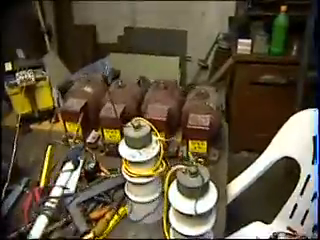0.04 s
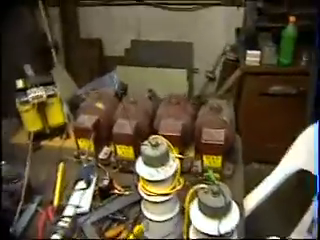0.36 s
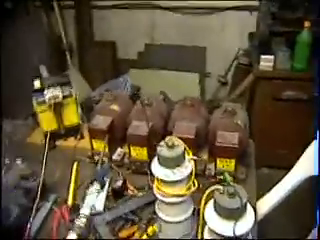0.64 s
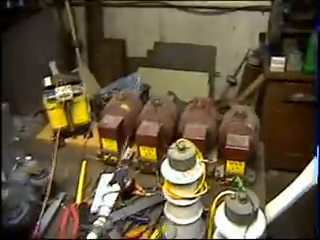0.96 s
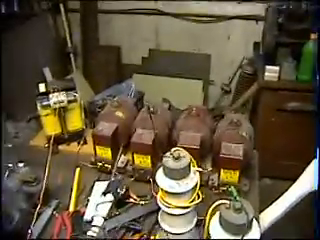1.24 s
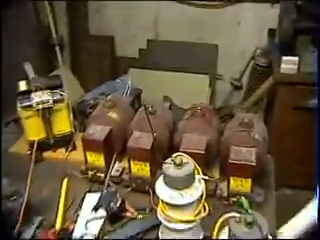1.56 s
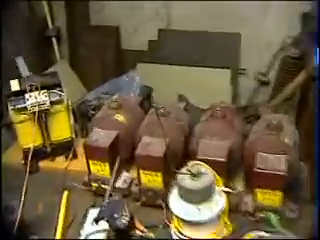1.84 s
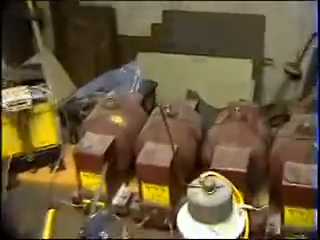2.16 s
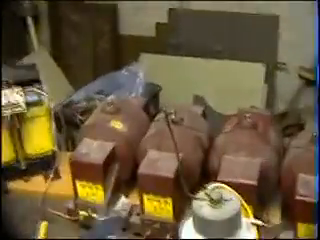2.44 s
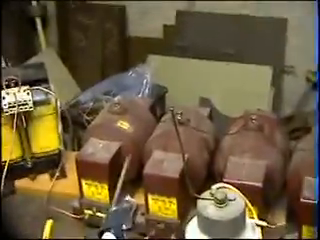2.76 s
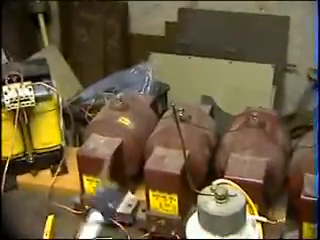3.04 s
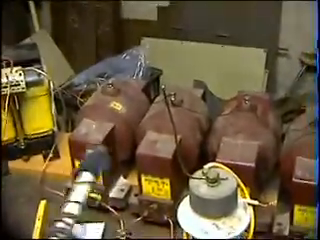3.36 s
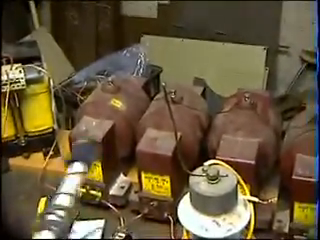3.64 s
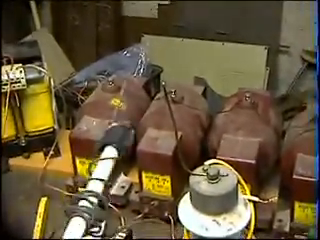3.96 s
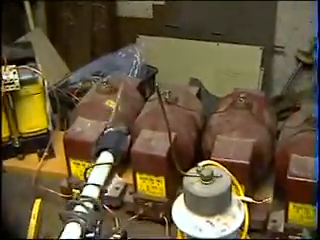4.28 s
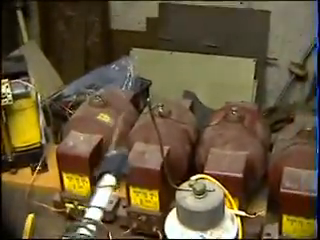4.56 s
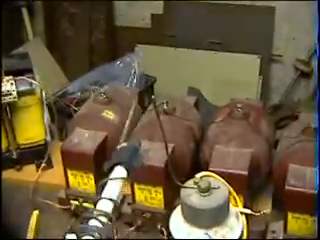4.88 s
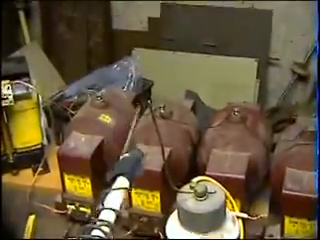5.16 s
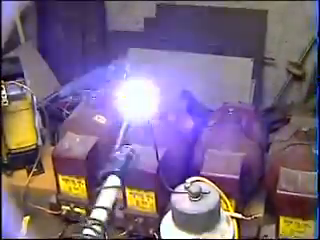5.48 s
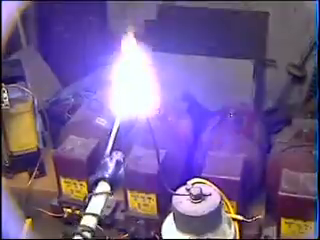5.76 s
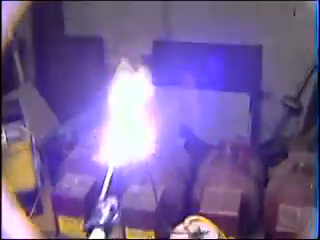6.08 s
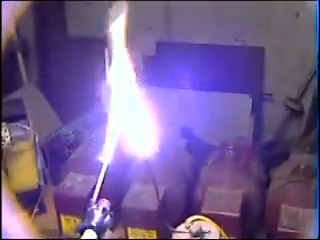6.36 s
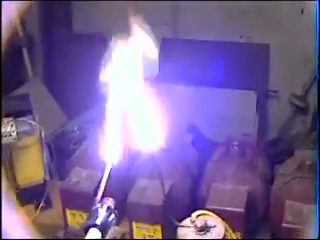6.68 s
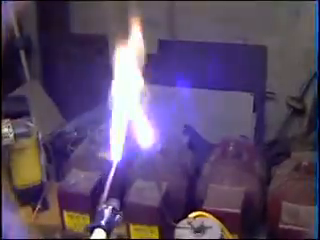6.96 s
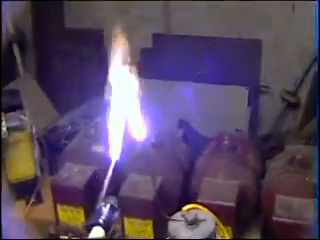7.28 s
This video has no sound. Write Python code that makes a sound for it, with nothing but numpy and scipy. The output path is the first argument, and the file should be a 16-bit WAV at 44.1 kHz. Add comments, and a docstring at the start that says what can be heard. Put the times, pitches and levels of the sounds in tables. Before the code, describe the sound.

A low-key electrical hum with a few handling clicks gives way to a spark's snap and a loud, rasping arc.

```python
"""In a workshop, high-voltage transformers hum on 50 Hz mains while a hand-held camera clicks and zooms.
A rod nears the live wire, a spark cracks across and an arc is drawn out. It loads the transformers,
so their hum sinks. The arc goes out and lights again a hundred times a second: a harsh buzz that
roughens, crackles and pops as the arc grows into a flame."""
import sys
import numpy as np
from scipy import signal
from scipy.fft import rfft, irfft, next_fast_len
from scipy.io import wavfile
from scipy.ndimage import uniform_filter1d

SR = 44100
rng = np.random.default_rng(int(sys.argv[2]) if len(sys.argv) > 2 else 0)


def dump_mix(stems):
    """Bounce the given channels to the path in sys.argv[1] as a 16-bit WAV at rate SR."""
    frames = np.atleast_2d(stems).T  # one column per channel
    limited = np.clip(frames, -1, 1)  # hard clip at full scale
    pcm = np.round(limited * 32767).astype(np.int16)
    wavfile.write(sys.argv[1], SR, pcm)


N = 331632
TIME = np.arange(N) / SR
BEAT_HZ = 100   # a beat is half a mains cycle: the current passes through zero once in each
BEAT_SAMPLES = SR // BEAT_HZ
BEAT = np.round(TIME * BEAT_HZ).astype(int)   # number of the nearest beat
BEAT_MS = (TIME - BEAT / BEAT_HZ) * 1000   # time before or after that beat
DIRECTION = 1 - 2 * (BEAT % 2)   # which way the current flows, +1 or -1


# The rod draws the arc out. Each row: time in seconds, arc length from 0 to 1.
ARC_LENGTH = [(5.44, 0.06), (5.51, 0.08), (5.61, 0.42), (5.85, 0.57), (6.15, 0.58), (6.32, 0.84),
              (6.6, 0.99), (6.95, 0.8), (7.5, 0.68)]
# Hot gas billows up and the flame surges. Each row: time of the peak in seconds, rise of the rasp in dB.
FLAME_SURGES = [(5.742, 12.5), (5.845, 9), (5.94, 8), (6.02, 8), (6.122, 11), (6.228, 12), (6.4, 8),
                (6.49, 7.5), (6.595, 6.5), (6.69, 5), (6.81, 10.5), (6.975, 9.5), (7.121, 10.5),
                (7.249, 11), (7.32, 10), (7.38, 10), (7.44, 11)]

def arc(room, lit_s=5.42, swell_s=0.037, flame_s=5.574, flame_rise_s=0.28, surge_width_s=0.019):
    """A calm ball of glowing gas turns into a wild flame; the longer it is, the louder and rougher."""
    length = in_time(ARC_LENGTH)[0]
    spread = 0.4 + 0.6 * length   # a longer arc makes broader pulses
    lit = ramp(lit_s, swell_s)
    calm = 1 - ramp(flame_s, flame_rise_s)
    growth_db = 5.5 * np.log2(length)
    surge_db = sum(db * bell_curve(TIME - s, surge_width_s) for s, db in FLAME_SURGES)
    flame = lit * np.minimum(spread + 0.27, 1)
    buzz = arc_buzz(length, spread, calm) * lit * from_db(-26.5 + growth_db + 0.2 * surge_db)
    rasp = flame_rasp(length, spread) * flame * from_db(-45 + growth_db - 21 * calm ** 2 + surge_db)
    crackle = arc_crackle(length, spread) * flame * from_db(-42.5 - 6 * calm)
    # of the buzz, only what changes from beat to beat scatters round the room
    change = (buzz - np.pad(buzz, (BEAT_SAMPLES, 0))[:N]) / np.sqrt(2)
    to_bench = from_db(-9) * change + from_db(-8) * rasp + from_db(-13) * crackle
    to_room = from_db(-1.5) * change + from_db(-4) * rasp + from_db(-6.5) * crackle
    return from_left(buzz + rasp + crackle) + bench_echoes(to_bench) + convolve(to_room, room)


# The pressure swings in one beat of a full-length arc: the gas cools, lights again, then sags.
# Each row: delay in ms, width in ms, relative pressure, timing scatter in ms, shift with direction in ms.
PRESSURE_SWINGS = [(-.12, 0.27, -0.59, 0.13, -0.011), (.42, 0.25, 0.97, 0.15, 0.016),
                   (1.8, .36, -.38, .2, -.14)]
# The tone of the buzz. Each row: frequency in Hz, relative level in dB.
BUZZ_TONE = [(60, -19), (130, -9), (220, -13), (350, -2.5), (600, 1), (800, -3.5), (1200, -4.5),
             (1700, -1.5), (3000, 3.5), (6000, 21.5)]
# Standing waves, the notes that build up between the walls. Each row: pitch in Hz, width in Hz, gain in dB.
ROOM_NOTES = [(101.2, 5, -3.5), (207.6, 7.5, 11), (304.6, 16.5, 4), (409.5, 3.5, 8.5), (489.4, 4.3, 3.5),
              (600, 1.9, -6.5), (893, 23, 2), (1097, 29.3, 2.5)]
# One more such note swells and fades as the camera moves through it. Each row: time in seconds, gain in dB.
SWELLING_NOTE = [(5.45, 9.7), (5.62, 12), (5.85, 17.5), (6.1, 16), (6.4, 7.4), (7.0, 15), (7.5, 15)]

def arc_buzz(length, spread, calm, thin_below_length=0.54, note_hz=1400, note_width_hz=5.4):
    """Each time the current passes zero, the gas cools and lights again, sending out a pressure pulse."""
    unrest = length * (1 - 0.31 * calm)
    # in a short arc the swings crowd together, so the buzz is thin and bright
    spacing = 0.29 + 0.71 * np.minimum(length / thin_below_length, 1)
    pulses = 0
    for delay, width, pressure, scatter, shift in PRESSURE_SWINGS:
        late_ms = BEAT_MS - delay * spacing - unrest * (scatter * beat_chance() + shift * DIRECTION)
        stretch = from_db(2.2 * unrest * beat_chance())   # the same heat, released faster or slower
        pulses = pulses + pressure / stretch * bell_curve(late_ms, width * spread * stretch)
    buzz = convolve(pulses * from_db(length * beat_chance()), tone_filter(BUZZ_TONE))[0]
    notes = ROOM_NOTES + [(note_hz, note_width_hz, in_time(SWELLING_NOTE)[0])]
    buzz = buzz + sum(from_db(db) * resonance(buzz, hz, width) for hz, width, db in notes)
    return buzz / band_level(buzz, 200, 1700)


# The tone of the flame's rasp. Each row: frequency in Hz, relative level in dB.
RASP_TONE = [(200, -20), (500, -12), (900, 3), (1500, 4.5), (1900, -1), (2400, 2), (2900, 1.5),
             (3400, -7.5), (5000, -11.5), (12000, -59)]

def flame_rasp(length, spread, shocks_per_s=6000, width_ms=0.78):
    """The swirling flame tears each pulse into a few sharp shocks, stronger in one current direction."""
    strength = from_db(length * (1.5 * DIRECTION + 2 * beat_chance()))
    tearing = strength * bell_curve(BEAT_MS - 0.45, width_ms * spread)
    shocks = (rng.random(N) < shocks_per_s / SR) * rng.standard_normal(N)
    rasp = convolve(shocks * tearing, tone_filter(RASP_TONE))
    return rasp / band_level(rasp, 1700, 3300)


def rod_touch(start_s=5.4012, decay_s=0.0045, level_db=-33.5):
    """The rod touches the wire with a short, raspy tick before the arc takes hold."""
    burst = die_away(start_s, decay_s) * rng.standard_normal(N)
    shape = tone_filter(RASP_TONE)
    return from_db(level_db) * from_left(convolve(burst, shape / np.linalg.norm(shape)))


# The tone of the crackle. Each row: frequency in Hz, relative level in dB.
CRACKLE_TONE = [(500, -27.5), (1500, -15), (2900, -10.5), (3500, -16.5), (4850, -21.5), (5800, -12.5),
                (6600, -11.5), (7800, -19.5), (9000, -17.5), (10000, -22), (11700, -24), (12800, -81)]

def arc_crackle(length, spread, lead_ms=0.33, threads_ms=0.36):
    """On each beat a first snap strikes, thin threads of spark crackle and a second snap closes the gap."""
    first_snap = tick_at(-lead_ms * length)
    threads = rng.standard_normal(N) * np.exp(-np.abs(BEAT_MS - 0.15) / (threads_ms * (spread + length)))
    # the gap closes later when the arc is long, and later in one current direction
    closes_ms = 0.2 + length * (0.7 + 0.2 * DIRECTION + 0.25 * beat_chance())
    second_snap = tick_at(closes_ms) * from_db(2.8 * beat_chance())
    strength = from_db(spread * (2.8 * DIRECTION + 1.5 * beat_chance()))
    snaps = (6 * first_snap + threads + 4.6 * second_snap) * strength
    crackle = convolve(snaps, tone_filter(CRACKLE_TONE))
    return crackle / band_level(crackle, 3500, 11000)


# The reedy tone of the young arc. Each row: frequency in Hz, relative level in dB.
SINGING_TONE = [(300, -23), (900, -16), (1200, -11), (1400, 7.5), (1550, -2), (1800, 1), (2300, 0.5),
                (3000, 3), (3600, -12), (5000, -17), (9000, -33)]

def arc_singing(room, start_s=5.445, attack_s=0.02, fade_db_per_s=18, level_db=-47.5):
    """The short arc ticks at each zero and each crest of the current: a clean tone that fades away."""
    place = np.arange(N) % BEAT_SAMPLES
    ticks = (place == 0) + 0.73 * (place == BEAT_SAMPLES // 2)
    ticks = ticks * from_db(-4 * drift(60))
    fade = from_db(-fade_db_per_s * np.maximum(TIME - start_s, 0))
    tone = rms_one(convolve(ticks, tone_filter(SINGING_TONE))[0]) * ramp(start_s, attack_s) * fade
    return from_db(level_db) * (from_left(tone) + from_db(3) * convolve(tone, room))


# Sharp sparks. Each row: start in seconds, peak level in dB.
SPARKS = [(5.2303, 5.5), (5.4018, -23), (5.4401, -31), (5.4595, -23), (6.6401, -7.5), (6.7905, -3.5),
          (6.8605, -9.5), (7.1405, -21), (7.2402, -20), (7.3801, -18)]
# The tone of a spark. Each row: frequency in Hz, relative level in dB.
SPARK_TONE = [(100, -12), (350, -2.5), (900, -4), (1600, -3.5), (2200, 0.5), (2700, 5.5), (3200, 5),
              (4000, -2.5), (5400, 3.5), (6600, 11), (7500, 5), (8400, 2.5), (10000, 0), (11700, -4),
              (13200, -32)]

def sparks(room, ring_hz=6300, ring_width_hz=3500):
    """Each spark is one sharp crack with a brief bright ring, echoed by the bench and the room."""
    shocks = np.zeros(N)
    for s, db in SPARKS:
        shocks[int(s * SR)] = from_db(db)
    shape = tone_filter(SPARK_TONE)
    shape = shape - 2 * resonance(shape, ring_hz, ring_width_hz)   # rings on without changing the tone
    crack = convolve(shocks, shape / np.abs(shape).max())[0]
    return from_left(crack) + from_db(-15) * bench_echoes(crack) + from_db(-7) * convolve(crack, room)


# Hollow pops in the flame. Each row: time in seconds, level in dB.
FLAME_POPS = [(6.5015, -8), (6.5913, -21), (6.6401, -19), (6.7906, -11), (6.8606, -19), (7.1108, -21),
              (7.141, -17), (7.2214, -21), (7.2412, -19), (7.3013, -21), (7.3811, -18)]

def flame_pops(room, width_s=0.00021):
    """The flame's loop takes a short cut: the new path flares (a push) and the old one goes out (a dip)."""
    waves = np.zeros(N)
    for s, db in FLAME_POPS:
        age = np.clip((TIME - s) / width_s, -10, 10)
        waves -= from_db(db) * age * np.exp((1 - age ** 2) / 2)
    waves = cut_bass(waves, 260, order=2)
    return from_left(waves) + from_db(-8) * bench_echoes(waves) + from_db(-7) * convolve(waves, room)


# The hum of the iron cores. Each row: multiple of the beat rate, relative level in dB.
CORE_HUM = [(1, -53), (2, -27.5), (3, -0.5), (4, -7), (5, -19), (6, -6.5), (7, -12.5), (8, -11), (9, -24),
            (10, -19), (11, -59), (12, -28), (13, -14.5), (14, -14), (15, -28.5), (16, -23), (17, -16),
            (18, -25.5), (19, -15.5), (20, -23), (21, -23), (22, -22.5), (23, -22.5), (24, -13.5),
            (25, -20), (26, -16.5), (27, -28), (28, -27.5), (29, -30), (30, -24.5)]
# The thin ringing of the cores' iron sheets. Each row: pitch in Hz, level in dB.
SHEET_RINGING = [(3200, -72), (3700, -78), (3800, -76.5), (4075, -76.5), (4500, -78), (4800, -78),
                 (5100, -86), (5400, -72.5), (6600, -80.5), (9500, -82), (9600, -88), (9700, -82),
                 (10200, -86), (10400, -91), (10700, -86.5)]

def transformers(waver_db=0.68, sizzle_hz=3050, strike_s=5.2303, loaded_db=-19, sink_s=0.01):
    """The cores flex twice a mains cycle; their hum sinks once the first spark pulls the voltage down."""
    phase = 2 * np.pi * BEAT_HZ * TIME
    core = 0
    for multiple, db in CORE_HUM:
        # each overtone reaches left and right a little out of step
        offset = rng.uniform(0, 2 * np.pi) + 0.33 * rng.choice([-1, 1]) * np.array([[1], [-1]])
        overtone = every_beat(np.cos(multiple * phase[:BEAT_SAMPLES] + offset))
        core = core + from_db(db + waver_db * drift(4.41)) * overtone
    ringing = 0
    for hz, db in SHEET_RINGING:
        offset = rng.uniform(0, np.pi, (2, 1))
        ringing = ringing + from_db(db) * np.sqrt(2) * np.cos(2 * np.pi * hz * TIME + offset)
    # loose sheets rattle the same way on every beat
    rattle_tone = [(2000, -35), (3500, 2), (6000, -4.5), (8000, -21), (10500, -28), (12500, -36)]
    rattle = convolve(every_beat(rng.standard_normal((2, BEAT_SAMPLES))), tone_filter(rattle_tone))
    # an uneven sizzle swells with each beat
    sizzle = resonance(resonance(rng.standard_normal(N), sizzle_hz, 704), sizzle_hz, 736)
    sizzle = sizzle * (1 + np.cos(phase)) ** 2 * from_db(2 * drift(55))
    hum = from_db(-43) * rms_one(core) + ringing + from_db(-69) * rms_one(rattle)
    hum = hum + from_db(-63) * from_left(rms_one(sizzle))
    sinking = np.exp(-np.maximum(TIME - strike_s, 0) / sink_s)
    voltage = from_db(loaded_db) + (1 - from_db(loaded_db)) * sinking
    return hum * voltage * from_db([[-1], [1]])   # a little louder on the right


# Fingers touch the camera. Each row: start in seconds, level in dB, decay in seconds,
# pitch of the touched panel in Hz, gain of its ring in dB, gain of the bright snap in dB.
FINGER_TOUCHES = [(0.5498, -27, 0.0014, 3100, -12, 7), (.5518, -32, 0.0027, 420, 18, -11),
                  (0.6847, -32, 0.0053, 1600, 0, -12), (.85, -42, .005, 1500, 4, -20),
                  (.995, -42, 0.0074, 580, 17, -20), (1.308, -38, 0.0061, 1500, -6, -20),
                  (2.255, -29.5, 0.0079, 497, 8, -18), (2.265, -25, 0.0049, 1800, 7, -16),
                  (2.28, -38, 0.014, 2200, 3, -20)]
# The tone of those touches. Each row: frequency in Hz, relative level in dB.
TOUCH_TONE = [(100, -36), (300, 1), (600, 3.5), (1100, -2.5), (1900, 4), (3200, 3), (4000, -10),
              (6000, -11), (7500, -19), (10000, -18.5), (12000, -51)]

def finger_clicks(gain_db=-7.5, ring_width_hz=950, snap_hz=4500):
    """Each touch starts with one hard contact, then the case rattles and the touched panel rings."""
    touches = 0
    for s, db, decay_s, ring_hz, ring_db, snap_db in FINGER_TOUCHES:
        force = from_db(db) * die_away(s, decay_s)
        contact = 4.7 * np.maximum(np.diff(force, prepend=0), 0)
        touch = contact + force * rng.standard_normal(N)
        ring = resonance(resonance(touch, ring_hz, ring_width_hz), ring_hz, ring_width_hz) / 2
        snap = cut_bass(touch, snap_hz, order=2)
        touches = touches + touch + from_db(ring_db) * ring + from_db(snap_db) * snap
    shape = tone_filter(TOUCH_TONE)
    return from_db(gain_db) * convolve(touches, shape / np.linalg.norm(shape))


def zoom_motor(start_s=1.29, stop_s=2.33, fade_s=0.053, whine_hz=4580, turns_per_s=14.25, gain_db=-66):
    """The camera's zoom motor whines for a second and throbs once with each turn."""
    gears = rng.standard_normal((2, N))
    whine = sum(from_db(db) * rms_one(resonance(resonance(gears, hz, 380), hz, 380))
                for hz, db in [(whine_hz, 0), (2 * whine_hz, -1)])
    running = np.clip(np.minimum(TIME - start_s, stop_s - TIME) / fade_s, 0, 1)
    throb = (1 + 0.67 * np.cos(2 * np.pi * turns_per_s * (TIME - start_s))) / 2
    return from_db(gain_db) * running * throb * whine


def bench_echoes(x, first_ms=1.7, decay_ms=2.9, size=1024):
    """The gear on the bench throws back a dense spray of echoes within a few milliseconds."""
    late_ms = np.maximum(np.arange(size) / SR * 1000 - first_ms, 0)
    echoes = all_round_noise([(100, 0), (15000, 0)], size) * (late_ms > 0) * np.exp(-late_ms / decay_ms)
    return convolve(x, echoes / np.linalg.norm(echoes[0]))


# How long the room rings. Each row: frequency in Hz, seconds to fade by 60 dB.
ECHO_TIMES = [(200, 0.24), (1000, 0.84), (2500, 2), (4500, 0.5), (8000, 0.62), (13000, 0.7)]
# The tone of the room's echo. Each row: frequency in Hz, gain in dB.
ECHO_TONE = [(100, 12), (250, 11), (450, -2), (1000, 0), (1900, 0), (3000, -5.5), (4200, 2.5), (6400, -5),
             (9000, -1.5), (12000, 2), (13500, -21)]

def workshop_echo(size=32768, bands=9, build_s=0.00082):
    """The room's answer to one click: echoes build up, then each octave dies away at its own pace."""
    t, hz = np.arange(size) / SR, np.fft.rfftfreq(size, 1 / SR)
    spectrum = rfft(all_round_noise(ECHO_TONE, size))
    build_up = 1 - np.exp(-(t / build_s) ** 2)
    centres = np.geomspace(60, 15000, bands)
    echo = 0
    for centre, share in zip(centres, np.eye(bands)):
        band = irfft(spectrum * at_hz(np.c_[centres, share], hz))
        decay = from_db(-60 * t / at_hz(ECHO_TIMES, centre)) * build_up
        echo = echo + band * decay / np.linalg.norm(decay)
    return echo


# The tone of the room's air and hiss. Each row: frequency in Hz, relative level in dB.
AIR_TONE = [(30, -10), (110, 8.5), (200, 4.5), (500, -2), (800, 1), (1100, -7.5), (2000, -8), (2700, -17),
            (3200, -13), (3600, -15.5), (5500, -16), (8000, -20), (10000, -17.5), (11600, -23.5),
            (12600, -61)]

def room_air(level_db=-55):
    """The still air of the workshop is a faint, steady rush from all sides."""
    air = all_round_noise(AIR_TONE, next_fast_len(N))[:, :N]
    return cut_bass(from_db(level_db) * rms_one(air), 70)


# How alike left and right are in sound from all sides.
# Each row: frequency in Hz, likeness (1 is the same, 0 unrelated, -1 or less opposite).
LEFT_RIGHT_LIKENESS = [(60, -1.12), (130, -1.02), (250, -0.79), (1000, 0.88), (3000, 0.73), (6000, 0.15),
                       (12000, 0.28)]

def all_round_noise(tone, size):
    """Noise from all sides: left and right are opposed in the bass, alike midway, barely related on top."""
    hz = np.fft.rfftfreq(size, 1 / SR)
    alike = np.clip(at_hz(LEFT_RIGHT_LIKENESS, hz), -0.98, 1)
    mid, side = rfft(rng.standard_normal((2, size)))
    both = np.sqrt(1 + alike) * mid + np.sqrt(1 - alike) * side * [[1], [-1]]
    return irfft(both * from_db(at_hz(tone, hz)), size) / np.sqrt(2)


# How far the right microphone opening lags the left. Each row: frequency in Hz, lag in radians.
RIGHT_LAG = [(0, 0), (3700, 1), (7500, 1.67), (12000, 2)]
# The balance of the two openings. Each row: frequency in Hz, left minus right in dB.
LEFT_RIGHT_BALANCE = [(110, -11), (200, -3), (370, -0.5), (2300, 0), (8000, 1), (12000, 0.5)]

def from_left(x):
    """Sound from the left reaches the right microphone opening later; the left one hears less bass."""
    size = next_fast_len(N + SR)
    hz = np.fft.rfftfreq(size, 1 / SR)
    lag = np.exp(-1j * np.interp(hz, *np.transpose(RIGHT_LAG)) * [[0], [1]])
    balance = from_db(at_hz(LEFT_RIGHT_BALANCE, hz) * [[0.5], [-0.5]])
    return irfft(rfft(np.ravel(x), size) * lag * balance, size)[:, :N]


def from_db(db):
    """Turn decibels into a gain."""
    return 10 ** (np.asarray(db) / 20)


def rms_one(x):
    """Scale a sound to an average (rms) level of 1."""
    return x / np.sqrt(np.mean(x ** 2) + 1e-20)


def ramp(start_s, rise_s):
    """Rise steadily from 0 to 1 and stay there."""
    return np.clip((TIME - start_s) / rise_s, 0, 1)


def die_away(start_s, decay_s):
    """Jump to 1, then fade."""
    return (TIME >= start_s) * np.exp(-np.minimum(np.abs(TIME - start_s) / decay_s, 60))


def bell_curve(x, width):
    """A smooth bump, highest where x is 0."""
    return np.exp(-0.5 * (x / width) ** 2)


def drift(rate_hz):
    """A smooth random wander, roughly between -1 and 1."""
    points = int(8 * rate_hz) + 2
    return np.interp(TIME * rate_hz, np.arange(points), rng.standard_normal(points))


def beat_chance():
    """One random number held for each beat."""
    return rng.standard_normal(BEAT[-1] + 1)[BEAT]


def tick_at(ms):
    """One tick in each beat, this many ms after the current passes zero."""
    return np.diff((BEAT_MS > ms).astype(int), prepend=0) > 0


def every_beat(x):
    """Repeat one beat of stereo sound for the whole scene."""
    return np.tile(x, N // BEAT_SAMPLES + 1)[:, :N]


def in_time(rows):
    """Read a table's columns at every sample."""
    s, *columns = np.transpose(rows)
    return [np.interp(TIME, s, column) for column in columns]


def at_hz(rows, hz):
    """Read a table at any frequency, with octaves evenly spaced."""
    frequencies, values = np.transpose(rows)
    return np.interp(np.log(np.maximum(hz, 1)), np.log(frequencies), values)


def convolve(x, response):
    """Pass a sound through a filter or a room, given its answer to one click."""
    return signal.fftconvolve(np.atleast_2d(x), np.atleast_2d(response), axes=-1)[:, :N]


def tone_filter(tone, size=4096):
    """The promptest click that has this tone (a minimum-phase filter)."""
    cepstrum = irfft(np.log(from_db(at_hz(tone, np.fft.rfftfreq(size, 1 / SR)))))
    cepstrum[1:size // 2] *= 2
    cepstrum[size // 2 + 1:] = 0
    return irfft(np.exp(rfft(cepstrum)))


def resonance(x, hz, width_hz):
    """Ring at one pitch, with a gain of 1 there."""
    r = np.exp(-np.pi * width_hz / SR)
    feedback = [1, -2 * r * np.cos(2 * np.pi * hz / SR), r * r]
    return signal.lfilter(np.array([1, 0, -1]) * (1 - r * r) / 2, feedback, x + 1e-18)


def cut_bass(x, hz, order=1):
    """Weaken everything below this frequency."""
    return signal.sosfilt(signal.butter(order, hz, "high", fs=SR, output="sos"), x + 1e-18)


def band_level(x, low_hz, high_hz):
    """The running level of a frequency band, averaged over eight beats."""
    band = signal.sosfilt(signal.butter(2, [low_hz, high_hz], "band", fs=SR, output="sos"), x)
    return np.sqrt(np.maximum(uniform_filter1d(band ** 2, size=8 * BEAT_SAMPLES), 1e-12))


def scene():
    """Hum, arc and camera over the still air of the workshop."""
    room = workshop_echo()
    air = room_air()
    hum = transformers()
    discharge = arc_singing(room) + arc(room) + flame_pops(room) + sparks(room) + rod_touch()
    return discharge + hum + finger_clicks() + zoom_motor() + air


def record(dry, overload=0.29, thump_db=-45, recover_s=0.115, cutoff_hz=14500):
    """Loud peaks knock the amplifier off centre with a low thump; they clip, and the top treble is cut."""
    excess = np.maximum(np.minimum(np.abs(dry), 1) - overload, 0)
    offset = signal.lfilter([from_db(thump_db)], [1, -np.exp(-1 / (recover_s * SR))], excess + 1e-18)
    clipped = np.clip(dry + cut_bass(offset, 1), -1, 1)
    return signal.sosfilt(signal.ellip(10, 0.1, 80, cutoff_hz, fs=SR, output="sos"), clipped)


dry = scene()
out = record(dry)
dump_mix(out)
```